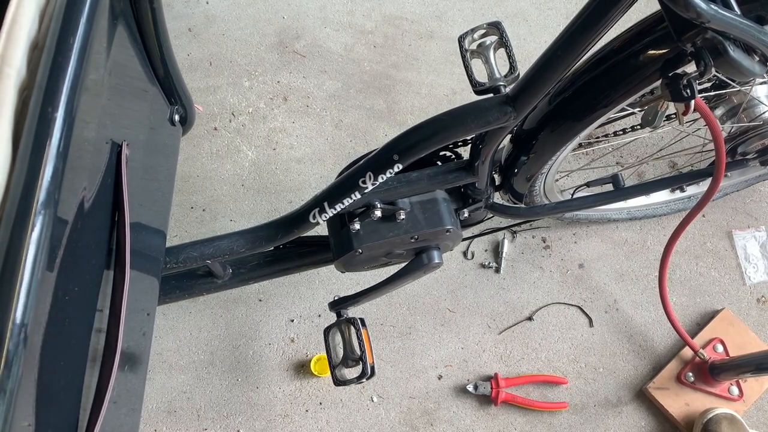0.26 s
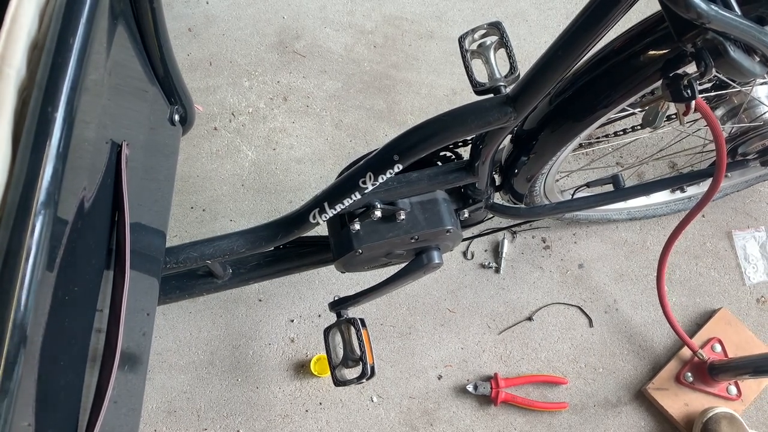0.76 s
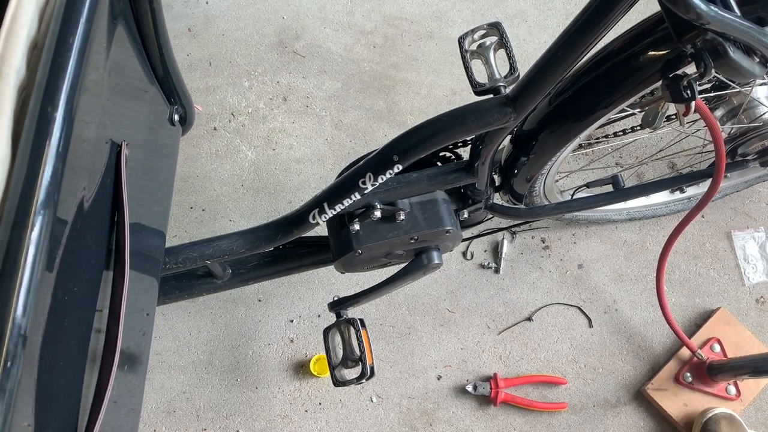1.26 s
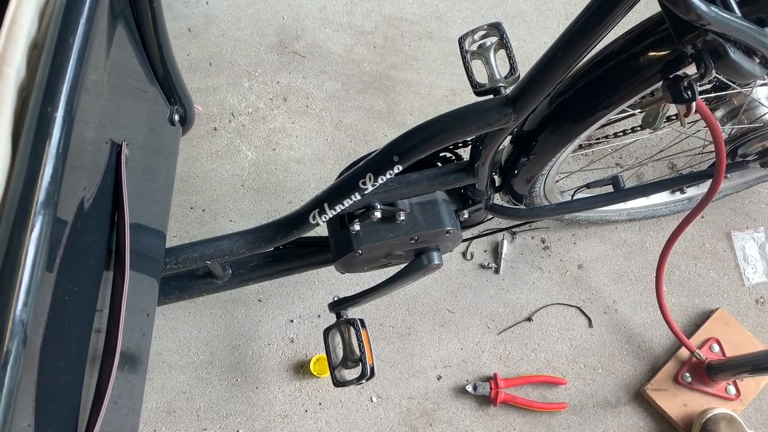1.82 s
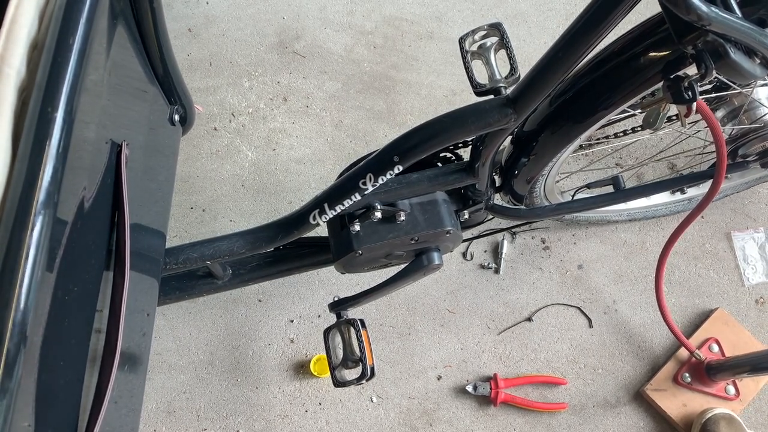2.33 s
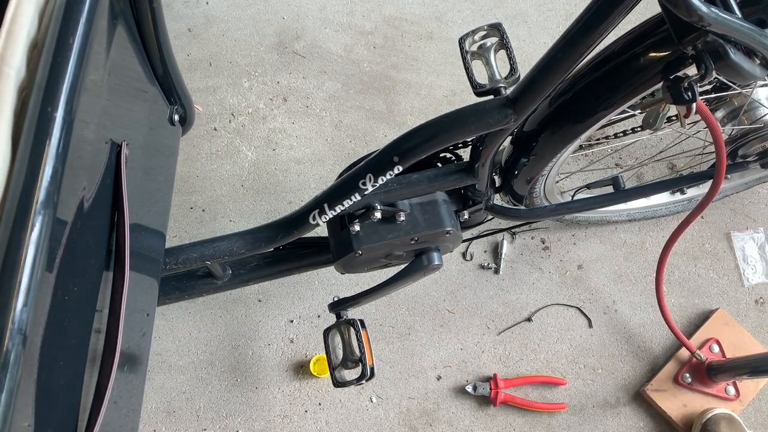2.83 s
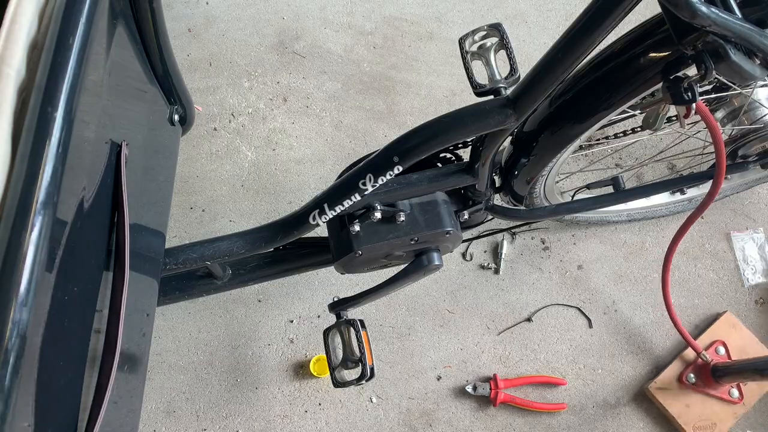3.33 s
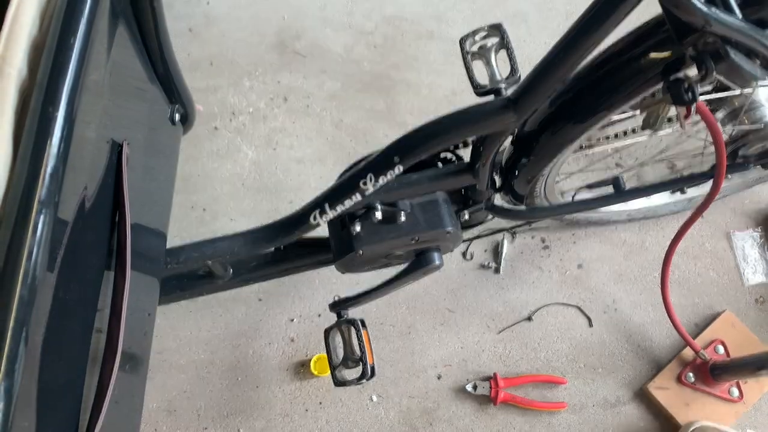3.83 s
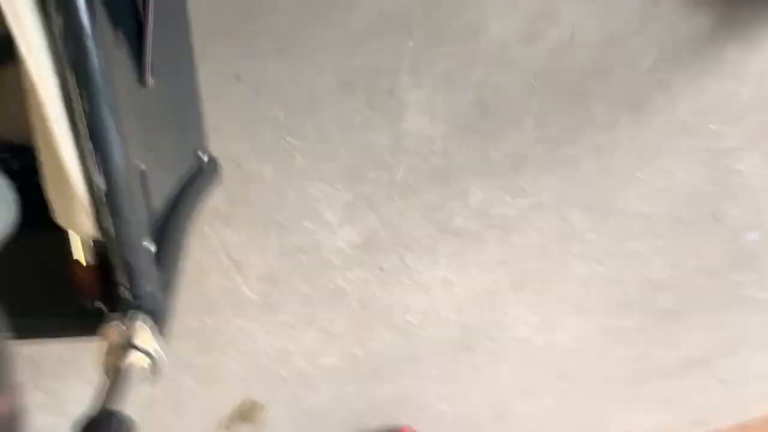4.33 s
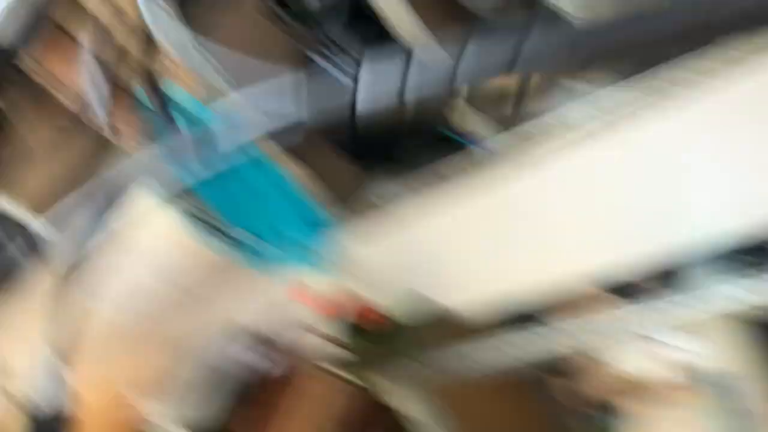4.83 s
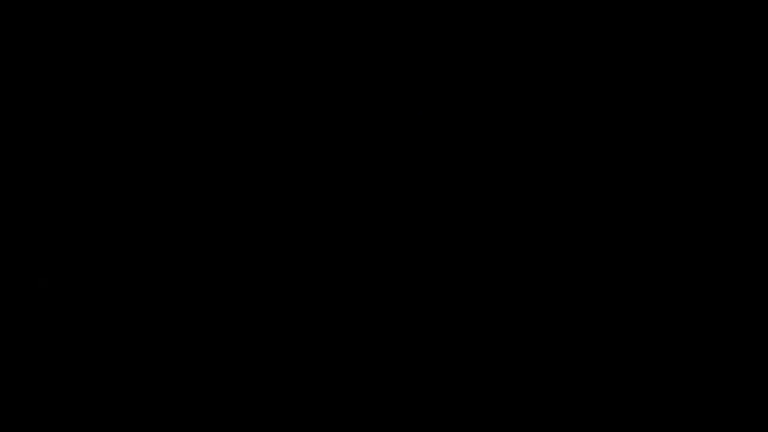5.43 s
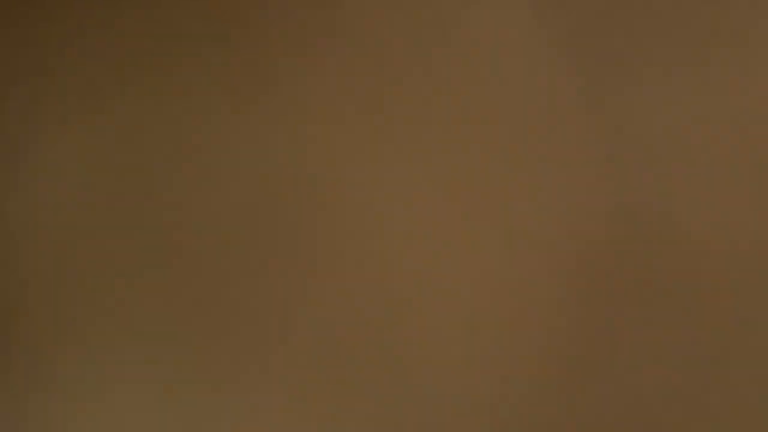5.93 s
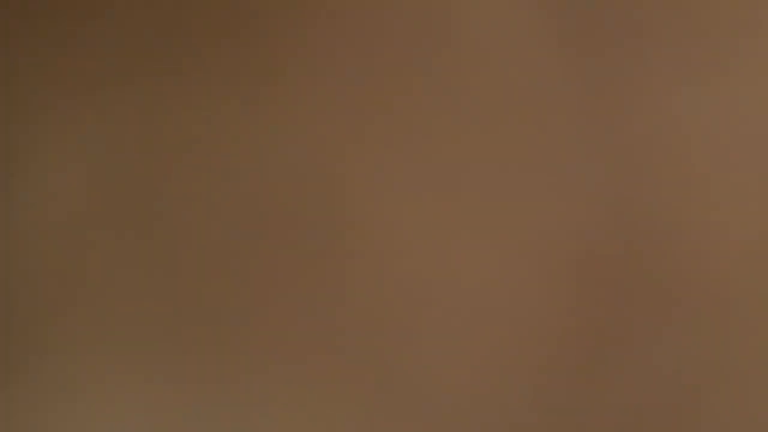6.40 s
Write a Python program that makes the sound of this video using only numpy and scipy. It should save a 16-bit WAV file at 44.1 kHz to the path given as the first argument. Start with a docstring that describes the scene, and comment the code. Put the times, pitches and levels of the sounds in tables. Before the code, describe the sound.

A floor pump hisses and knocks in steady strokes in a garage, then stops, and fingers bump and rub loudly on the microphone's case.

```python
"""Floor pump in a garage, then a handled phone

A floor pump on a wooden board inflates a bicycle tyre: coloured, fluttering noise hisses and sprays, a sinking
tone whistles, and decaying modes with noise bursts make the knocks at the bottom, the clicks at the top and
the clacks of the board on the concrete. Pumping stops; fingers bump, rub and squeak on the phone as it is swung
round and put down (swelling notes, soft thumps, stick-slip noise). A few light ticks of noise come late.
"""
import sys
import numpy as np
from scipy import signal
from scipy.fft import rfft, irfft
from scipy.io import wavfile
from scipy.ndimage import uniform_filter1d

SR = 44100
rng = np.random.default_rng(int(sys.argv[2]) if len(sys.argv) > 2 else 0)


def to_wav(sig):
    """Store sig (one row per channel, or 1-D mono) as 16-bit WAV at the path in sys.argv[1].

    Samples outside -1..1 are clipped; the rate is SR.
    """
    pcm = np.clip(np.atleast_2d(sig), -1, 1) * 32767
    pcm = np.round(pcm).astype(np.int16)
    wavfile.write(sys.argv[1], SR, pcm.T)  # frames by channels


N = 293706
TIME = np.arange(N) / SR

# All levels here are relative: functions add offsets, flutter and panning. Knocks: down strokes ending as the
# piston hits the bottom, the last two as the pump is handled. Each row: time of knock in seconds, ring, crack,
# air and whistle levels in dB, whistle sag in Hz per second.
KNOCKS = [(0.067, -18.5, -16.5, -50, -44, 6000), (0.7653, -15.5, -15, -44.5, -47.5, 9000),
          (1.5232, -17.5, -18, -44.5, -48, 3800), (2.2466, -16, -13, -48, -47, 7700),
          (2.74, -32, -32, -70, -82, 5000), (3.176, -27.5, -32, -88, -87, 5000),
          (3.489, -48, -28, -68, -88, 5000)]
# Pump body modes. Each row: nominal frequency in Hz, level in dB, t60 in seconds.
PUMP_MODES = [(590, -18, .03), (870, -14, .045), (1005, -17, .12), (1030, 0, .02), (1075, -16, .11),
              (1400, -15, .035), (1790, -18, .1), (1900, -9, .027), (1925, -17.5, .09), (2010, -20, .06),
              (2980, -19, .07)]
# Steel barrel modes. Each row: nominal frequency in Hz, level in dB, t60 in seconds.
BARREL_MODES = [(1750, -1.5, .1), (3100, -6, .09), (3960, 2, .16), (7580, 6, .055), (8110, 6.5, .06),
                (9950, 2.5, .06), (13380, 5, .045)]
# Wooden board modes. Each row: nominal frequency in Hz, level in dB, t60 in seconds.
BOARD_MODES = [(980, -3, 0.044), (1340, 0, .055), (1500, -4, 0.07), (2150, -7.5, 0.037)]
# Steel rod and handle modes. Each row: nominal frequency in Hz, level in dB, t60 in seconds.
HANDLE_MODES = [(2190, 5, .07), (2866, -2.5, .25), (3671, -1.5, .18), (5340, -4, 0.23)]
# Up strokes. Each row: time of top in seconds, click, air and inlet puff levels in dB.
UP_STROKES = [(0.372, -18, -39.5, -39), (1.0919, -18, -40, -40), (1.8408, -23.5, -43, -41.5),
              (2.653, -42, -48.5, -50), (3.1725, -36, -57.5, -64)]
# Board and pump clack on the floor. Each row: time in seconds, clack and thud levels in dB.
CLACKS = [(0.4602, -15, -42.5), (0.486, -27, -45), (1.1845, -14, -57), (1.206, -23, -47), (1.927, -23, -48),
          (2.802, -30, -71), (2.983, -34.5, -72), (3.895, -29, -52), (3.9829, -23.5, -38)]
# Handle clinks on the rod. Each row: time in seconds, level in dB.
CLINKS = [(0.849, -34.5), (1.205, -28.5), (2.3351, -24.5)]
# Seal, shoes and board rub. Each row: start in seconds, length in seconds, centre in Hz,
# approximate width in Hz, level in dB.
SCUFFS = [(0.308, 0.032, 987, 69.3, -44), (1.025, 0.041, 974, 71, -45), (1.75, 0.047, 1000, 90, -44),
          (1.848, 0.053, 200, 95, -36), (1.913, 0.11, 180, 120, -31.5), (1.918, 0.091, 425, 397, -43.5),
          (2.549, 0.13, 2800, 1400, -47), (2.938, 0.083, 460, 630, -40), (3.96, 0.091, 403, 479, -37),
          (4.157, 0.078, 297, 168.4, -36.5), (4.097, 0.04, 420, 450, -40), (4.652, 0.22, 257, 71.4, -50.5)]
# Rustles as the pump is let go and the phone swung round. Each row: start in seconds, length in seconds,
# hiss and fine spray levels in dB.
RUSTLES = [(2.942, 0.062, -45, -51), (3.33, 0.2, -55, -68), (3.512, .17, -53, -58.5),
           (3.864, 0.24, -49.5, -51.5), (3.967, 0.038, -40, -40), (4.102, 0.051, -48.5, -47.5),
           (4.126, 0.29, -48.5, -57), (3.002, 2.38, -63.5, -70)]
# Fingers bump the phone case. Each row: time in seconds, note level in dB, pitch at full swell in Hz,
# tick level in dB, swell in seconds, shove level in dB.
BUMPS = [(3.441, -45, 345, -56, .005, -54), (4.2467, -7.5, 844, -35.5, .004, -20.5),
         (4.251, -10.5, 450, -25.5, .0045, -19.5), (4.271, -11, 760, -9.5, .005, -22.5),
         (4.281, -10.5, 583, -20, .0045, -16), (4.4073, -9, 620, -23, .0042, -19),
         (4.427, -37, 584.5, -22, 0.0034, -46), (4.49, -16.5, 620, -30.5, 0.0049, -21.5),
         (4.529, -26, 520, -50, .007, -45), (4.542, -7.5, 450, -11, 0.0037, -10),
         (4.585, -18.5, 575, -39, .0045, -32.5), (4.602, -14.5, 640, -28.5, 0.0023, -15.5),
         (4.648, -30.5, 560, -40, .007, -27), (5.097, -15, 500, -13, .0055, -16),
         (5.2474, -8.5, 516, -13, 0.0045, -22), (5.2566, -16, 560, -22.5, .004, -19),
         (5.268, -19.5, 540, -36.5, .004, -22), (5.313, -29, 620, -50, .0035, -28),
         (5.358, -32.5, 580, -52.5, 0.0043, -30.5), (5.408, -17, 540, -30.5, 0.0046, -19),
         (5.4469, -9, 580, -13, .004, -24), (5.4552, -10.5, 610, -12, .0033, -15),
         (5.466, -19, 486, -27.5, .004, -22.5), (5.526, -23, 500, -29.5, .003, -19),
         (5.6, -36.5, 480, -37.5, .004, -31)]
# The plastic case creaks in single snaps. Each row: time in seconds, level in dB, nominal pitch in Hz.
CREAKS = [(4.2762, -17, 1390), (4.542, -13.5, 1187), (5.098, -14, 1100), (5.2477, -12, 1676),
          (5.4485, -13, 1580), (5.4558, -7.5, 1950)]
# Skin rubs over the case. Each row: start in seconds, length in seconds, mean slip rate in Hz,
# tone and rasp levels in dB, rasp top in Hz, left minus right in dB.
RUBS = [(4.203, 0.1, 590, -39, -25.5, 13000, 5), (4.264, 0.026, 694, -25.5, -12.5, 16000, 7),
        (5.423, 0.062, 563, -45, -32, 6000, 11.5), (5.425, 0.22, 528, -61.5, -48.5, 10200, 3)]
# The hand presses and buffets the case. Each row: start in seconds, length in seconds, top in Hz, level in dB.
PUSHES = [(4.234, 0.081, 700, -29), (4.512, 0.056, 644, -29.5), (4.874, 0.058, 450, -23.5),
          (4.942, 0.065, 260, -32.5), (5.076, 0.04, 330, -24.5), (5.234, 0.062, 693, -26.5),
          (5.427, 0.062, 647, -24), (5.552, 0.035, 450, -35), (5.588, 0.1, 108, -34.5)]
# Something is handled further off. Each row: time in seconds, level in dB.
TICKS = [(4.769, -41), (5.835, -46), (6.002, -40), (6.087, -41), (6.13, -49.5), (6.189, -42.5),
         (6.239, -41.5), (6.441, -57.5), (6.628, -44.5)]
# Rumble of the moving phone, interpolated. Each row: time in seconds, level in dB.
RUMBLE = [(0.0, -60), (3.5, -58), (4.01, -49), (4.15, -38), (4.38, -46.5), (4.92, -41.5), (5.29, -63),
          (5.47, -33.5), (5.53, -41), (5.67, -65), (6.03, -79), (6.66, -81.5)]
# Resonances of the left microphone port. Each row: mean frequency in Hz, level in dB.
PORT_MODES = [(1790, 1), (2480, -3), (2920, 1), (3150, 1), (3350, -0.5), (4060, -1.5), (4680, -4.5),
              (4860, -1.5), (7980, -5.5)]
# Spectrum of the piston crack. Each row: frequency in Hz, level in dB.
CRACK_COLOUR = [(60, -22.5), (130, -2.5), (270, -38), (550, -8.5), (720, -12.5), (1080, 3.5), (1400, 4.5),
                (1900, 5.5), (2500, -3), (3100, -4.5), (4500, -7), (7000, -16), (12500, -11),
                (16000, -26.5)]
# Spectrum of the rod click. Each row: frequency in Hz, level in dB.
CLICK_COLOUR = [(230, -25), (500, -9), (1650, 3), (2050, -8), (2700, 7.5), (3800, 5.5), (5500, -1.5),
                (8000, 0.5), (13000, 7.5), (16000, -6.5)]
# Spectrum of the board clack. Each row: frequency in Hz, level in dB.
CLACK_COLOUR = [(450, -18), (750, -15.5), (1000, -0.5), (1400, 0), (2200, -6), (3500, -11.5), (7000, -20),
                (13000, -21), (16000, -34.5)]
# Spectrum of ticks and piston scrape. Each row: frequency in Hz, level in dB.
TICK_COLOUR = [(200, -23.5), (900, -6), (1250, 3), (1560, 9), (2000, 4.5), (2700, -1), (4000, -4.5),
               (7000, -11), (16000, -33)]
# Spectrum of ticks and grit on the phone case. Each row: frequency in Hz, level in dB.
CASE_COLOUR = [(300, 9.5), (1100, 7.5), (1800, 11.5), (2300, -2.5), (3100, -12), (4800, 1), (6500, -10.5),
               (8000, -0.5), (11000, -8), (13500, -1), (16000, -17)]
# Spectrum of air in the barrel and of handle contact. Each row: frequency in Hz, level in dB.
HISS_COLOUR = [(400, -7.5), (780, -7.5), (1000, 2.5), (1220, -2.5), (1600, 6), (2150, -3.5), (2400, 0.5),
               (3500, -5), (6000, -7), (8300, -6.5), (10300, -9.5), (11500, -18.5), (16000, -32)]
# Spectrum of the air spray. Each row: frequency in Hz, level in dB.
SPRAY_COLOUR = [(6000, -51), (10500, -4), (13900, 4), (15000, -10), (15600, -6.5), (16000, -20.5)]
# Spectrum of the rumble. Each row: frequency in Hz, level in dB.
RUMBLE_COLOUR = [(20, -22.5), (50, 2.5), (75, 4.5), (105, -1), (190, -8.5), (270, -9.5), (400, -19),
                 (1500, -41), (8000, -70.5)]
# Spectrum of the still garage. Each row: frequency in Hz, level in dB.
QUIET_COLOUR = [(30, -3.5), (120, -1), (400, -16.5), (1600, -12), (2500, -11), (7000, -19.5), (14000, -28)]
# Garage decay. Each row: frequency in Hz, t60 in seconds.
GARAGE_T60 = [(100, 0.31), (1000, 0.19), (3000, 0.27), (8000, 0.3), (15000, 0.13)]

# An up stroke gathers speed until the stop; the inlet puffs as it begins.
LIFT_S, LIFT_STOP_S, LIFT_SPRAY_DB = 0.17, 0.12, -4.5
PUFF_LEAD_S, PUFF_S = 0.19, 0.077
# A down stroke swells and is braked by the pressure; the valve sings towards its end.
PUSH_S, PUSH_SPRAY_DB = 0.2, -2.5
WHISTLE_S, WHISTLE_END_HZ = 0.15, 7430
# Air leaks steadily, then dies away.
LEAK_DB, LEAK_SPRAY_DB, LEAK_END_S, LEAK_FALL_DB_PER_S = -45.5, -51, 2.584, 64
# Dry grit under the seal.
GRIT_PER_S, GRIT_DB, GRIT_SPREAD_DB = 150, -9, 6
# Faint metallic ring during the swing.
RING_S, RING_ATTACK_S, RING_HOLD_S, RING_RELEASE_S = 4.22, 0.17, 0.42, 0.31
RING_HZ, RING_DB = 1460, -57.5
# Loose parts bounce ever more weakly after a blow.
BOUNCE_GAP_S, BOUNCE_DB, BOUNCE_FALL_DB = 0.012, -11.5, -2.5
# Skin drags on the case around every touch; level relative to the note.
DRAG_S, DRAG_LEAD_S, DRAG_DB, DRAG_LOW_HZ, DRAG_HIGH_HZ = 0.03, 0.0092, -19, 253, 760
BUMP_SAG_PER_S = 28  # exponential fall of pitch
PALM_S, PALM_DB, PALM_HZ = 4.898, -11, 140.6
CREAK_T60_S, CREAK_OVERTONE_RATIO, CREAK_OVERTONE_DB = 0.014, 1.5, -9.5
TICK_T60_S = 0.039
# A fingertip squeaks across the left microphone port.
SQUEAK_S, SQUEAK_LENGTH_S, SQUEAK_HZ, SQUEAK_DB, SQUEAK_RASP_DB = 5.069, 0.026, 436.5, -7.5, -9
TOP_HZ = 16200


def undb(db):
    """Amplitude gain from dB."""
    return 10 ** (np.asarray(db) / 20)


def on_log_axis(points, hz):
    """Interpolate (Hz, value) points over log frequency."""
    f, value = np.transpose(points)
    return np.interp(np.log(np.maximum(hz, 1)), np.log(f), value)


def unit(x):
    """Scale to rms 1."""
    return x / np.sqrt(np.mean(x ** 2))


def peak_at(x, db, size=176):
    """Scale so that the loudest 4 ms have this rms level."""
    loudest_power = uniform_filter1d(x ** 2, size).max()
    return x * undb(db) / np.sqrt(loudest_power)


def colour(x, points, size=2048):
    """Minimum-phase filter with the given spectrum."""
    log_gain = on_log_axis(points, np.fft.rfftfreq(size, 1 / SR)) * np.log(10) / 20
    cepstrum = irfft(log_gain)
    # Folding the cepstrum makes the filter causal.
    cepstrum[1:size // 2] *= 2
    cepstrum[size // 2 + 1:] = 0
    response = irfft(np.exp(rfft(cepstrum)))
    return signal.fftconvolve(x, response)[:len(x)]


def filt(x, hz, kind, order=2):
    """Butterworth filter."""
    sos = signal.butter(order, np.minimum(hz, SR / 2 - 1000), kind, fs=SR, output="sos")
    return signal.sosfilt(sos, x)


def fade(t60_s, size=8192):
    """Exponential decay, cut off after size samples."""
    return 1000 ** (-TIME[:size] / t60_s)


def arch(length_s):
    """Half-sine swell and fall."""
    return np.sin(np.linspace(0, np.pi, int(length_s * SR)))


def swell(start_s, length_s):
    """Full-length gain that rises and falls once."""
    return np.sin(np.pi * np.clip((TIME - start_s) / length_s, 0, 1))


def flutter(rate_hz, depth_db):
    """Gain that wanders between random steps."""
    steps = rng.standard_normal(1024)
    return undb(depth_db * np.interp(TIME * rate_hz, np.arange(len(steps)), steps))


def mottle(x, depth_db, size=1024):
    """Turbulence: narrow bands swell and sink on their own for a few tens of milliseconds."""
    bands = signal.stft(x, nperseg=size)[2]
    walk = rng.standard_normal(bands.shape[-2:])
    walk = uniform_filter1d(walk, size=6, axis=0)
    walk = uniform_filter1d(walk, size=4, axis=1)
    mottled = signal.istft(bands * undb(depth_db * unit(walk)), nperseg=size)[1]
    return unit(mottled[..., :N])


def burst(points, t60_s, attack_s=.0001, ragged_db=0):
    """Decaying coloured contact noise, broken into uneven grains of 64 samples."""
    envelope = fade(t60_s)
    size = len(envelope)
    envelope = envelope * np.minimum(TIME[:size] / attack_s, 1)
    grains = np.repeat(rng.standard_normal(size), 64)[:size]
    return colour(envelope * undb(ragged_db * grains) * rng.standard_normal(size), points)


def struck(modes, detune=0.0055):
    """Decaying modes set off together, their pitch a little different at every blow."""
    out = 0
    for hz, db, t60_s in modes:
        envelope = fade(t60_s)
        pitch_hz = hz * (1 + detune * rng.standard_normal())
        out = out + undb(db) * envelope * np.sin(2 * np.pi * pitch_hz * TIME[:len(envelope)])
    return out


def thump(hz, width=.35, body_db=-9, soft=1.3, cycles=1.5, size=8192):
    """A soft blow rings a damped shell and shoves it bodily; low notes lag by a few of their own cycles."""
    f = np.fft.rfftfreq(size, 1 / SR) + 1
    shell = 1 / (1 + 1j * (f / hz - hz / f) / width)
    body = undb(body_db) / (1 + (50 / f) ** 4) / (1 + (f / hz) ** 4)
    contact = 1 / np.sqrt(1 + (f / (soft * hz)) ** 14)
    lag = np.exp(-2j * np.pi * cycles * np.log(f))
    return irfft((shell + 1j * body) * contact * lag) * np.linspace(1, 0, size) ** 2


def bounces(points, t60_s, count=4):
    """Uneven, weakening after-hits that follow a blow of level 0 dB."""
    out = np.zeros(SR)
    for k, (early, size) in enumerate(rng.random((count, 2))):
        db = BOUNCE_DB + BOUNCE_FALL_DB * (k + 2 * size - 1)
        add(out, BOUNCE_GAP_S * (k + 1 - early / 2), peak_at(burst(points, t60_s), db))
    return out


def ports(x, lag_ms, pan_db, twist_rad=0):
    """Two microphones: positive lag reaches the right first, positive pan favours the left, twist parts phases."""
    f = np.fft.rfftfreq(len(x), 1 / SR)
    turn = np.exp(1j * (np.pi * f * lag_ms / 1000 + twist_rad / 2))
    left = irfft(rfft(x) / turn, len(x)) * undb(pan_db / 2)
    right = irfft(rfft(x) * turn, len(x)) / undb(pan_db / 2)
    return np.array([left, right])


def diffuse(size, apart_hz=550):
    """Noise from all sides: alike on both microphones in the bass, unrelated in the treble."""
    mid, side = rng.standard_normal((2, size))
    side = filt(side, apart_hz, "high", order=1)
    return np.array([mid + side, mid - side]) / np.sqrt(2)


def add(track, s, x):
    """Mix a sound in at time s."""
    start = int(s * SR)
    x, start = x[..., max(-start, 0):], max(start, 0)
    track[..., start:start + x.shape[-1]] += x[..., :N - start]


def background(quiet_db=-77):
    """Low noise rumbles on the moving phone, a fluttering sine rings faintly, soft noise is the still garage."""
    rumble = unit(np.array([colour(c, RUMBLE_COLOUR) for c in diffuse(N, apart_hz=221)]))
    rumble = rumble * undb(np.interp(TIME, *np.transpose(RUMBLE)))
    corners_s = np.cumsum([RING_S, RING_ATTACK_S, RING_HOLD_S, RING_RELEASE_S])
    envelope = np.interp(TIME, corners_s, [0, 1, 1, 0]) ** 2
    ring = np.sqrt(2) * envelope * np.sin(2 * np.pi * RING_HZ * TIME) * flutter(45, depth_db=2.5)
    quiet = unit(np.array([colour(c, QUIET_COLOUR) for c in diffuse(N)]))
    return rumble + undb(RING_DB) * ring + undb(quiet_db) * quiet


def airflow():
    """Gains of hiss and spray: leak, strokes, inlet puffs and rustles add in power."""
    leak = undb(-LEAK_FALL_DB_PER_S * np.maximum(TIME - LEAK_END_S, 0))
    parts = [(leak, LEAK_DB, LEAK_SPRAY_DB)]
    for top_s, _, db, puff_db in UP_STROKES:
        speed = np.interp(TIME, [top_s - LIFT_S, top_s, top_s + LIFT_STOP_S], [0, 1, 0])
        parts.append((np.sqrt(speed), db, db + LIFT_SPRAY_DB))
        parts.append((swell(top_s - PUFF_LEAD_S, PUFF_S), -np.inf, puff_db))  # spray only
    for knock_s, _, _, db, *_ in KNOCKS:
        parts.append((swell(knock_s - PUSH_S, PUSH_S), db, db + PUSH_SPRAY_DB))
    for s, length_s, db, fine_db in RUSTLES:
        parts.append((swell(s, length_s), db, fine_db))
    hiss_power = sum((shape * undb(db)) ** 2 for shape, db, _ in parts)
    spray_power = sum((shape * undb(db)) ** 2 for shape, _, db in parts)
    return np.sqrt(hiss_power), np.sqrt(spray_power)


def grit():
    """Sparse tiny clicks of very uneven size."""
    happens = rng.random(N) < GRIT_PER_S / SR
    size = np.minimum(rng.exponential(size=N), 4)
    return unit(happens * undb(GRIT_SPREAD_DB * size))


def air(hiss_db=-1, direct_db=-2):
    """Turbulent air and grit ring the barrel, air sprays past the seal; low and high parts flutter separately."""
    hiss_gain, spray_gain = airflow()
    direct = undb(direct_db) * rng.standard_normal(N) + undb(GRIT_DB) * grit()
    flow = diffuse(N) + ports(direct, lag_ms=.27, pan_db=-2)
    hiss = mottle(np.array([colour(c, HISS_COLOUR) for c in flow]), depth_db=2.5)
    low = filt(hiss, 2000, "low", order=1)
    hiss = low * flutter(35, depth_db=2.1) + (hiss - low) * flutter(70, depth_db=2)
    spray = mottle(colour(rng.standard_normal(N), SPRAY_COLOUR), depth_db=2)
    spray = spray * flutter(55, depth_db=1.4)
    return undb(hiss_db) * hiss_gain * hiss + spray_gain * spray


def valve(waver_hz=150, wander_hz=70):
    """An airy, wavering whistle that sinks as the stroke slows."""
    out = np.zeros(N)
    envelope = np.sqrt(np.abs(arch(WHISTLE_S)))
    t = TIME[:len(envelope)]
    for knock_s, _, _, _, db, sag_hz_per_s in KNOCKS:
        wander = np.interp(t, np.linspace(0, WHISTLE_S, 6), rng.standard_normal(6))
        pitch_hz = WHISTLE_END_HZ + sag_hz_per_s * (WHISTLE_S - t) + wander_hz * wander
        tone = np.sqrt(2) * np.sin(2 * np.pi * np.cumsum(pitch_hz) / SR)
        waver = unit(filt(rng.standard_normal(SR), waver_hz, "low"))[:len(envelope)]
        add(out, knock_s - WHISTLE_S, undb(db) * envelope * waver * tone)
    return out


def piston(ring_db=2.0, crack_db=-1.0, seat_s=0.0023, crack_t60_s=0.044, bounce_db=-0.5,
           scrape_s=.011, scrape_db=-23):
    """The piston scrapes into its seat, touches with a crack, rings the pump body and shakes its loose parts;
    the last knocks come as the pump is handled."""
    out = np.zeros(N)
    for s, db, bright_db, *_ in KNOCKS:
        ring = struck(PUMP_MODES, detune=.011)
        seating = np.minimum(TIME[:len(ring)] / seat_s, 1)
        scrape = burst(TICK_COLOUR, t60_s=.08, attack_s=scrape_s)
        crack = burst(CRACK_COLOUR, crack_t60_s, ragged_db=2.5) * seating
        add(out, s - scrape_s, peak_at(scrape, bright_db + scrape_db))
        add(out, s, peak_at(ring * seating, db + ring_db))
        add(out, s - .001, peak_at(crack, bright_db + crack_db))
        add(out, s, undb(db + bounce_db) * bounces(CRACK_COLOUR, t60_s=.018))
    return out


def scuffs():
    """Band noise in short arches: the seal squeaks on the upstroke, shoes and board judder on the floor."""
    out = np.zeros(N)
    for s, length_s, hz, width_hz, db in SCUFFS:
        envelope = arch(length_s)
        spread = 1 + width_hz / hz / 2
        judder = filt(rng.standard_normal(SR), [hz / spread, hz * spread], "band")[-len(envelope):]
        add(out, s, undb(db) * envelope * unit(judder))
    return out * flutter(70, depth_db=3)


def rod(click_db=-4, second_s=0.0039, second_db=-1, ring_db=-6, slide_s=0.0052, slide_db=-9, ragged_db=3):
    """The rod slides into the barrel cap, meets it in a bright, gritty double click and leaves the tube ringing."""
    out = np.zeros(N)
    for s, db, _, _ in UP_STROKES:
        slide = burst(CLICK_COLOUR, t60_s=0.05, attack_s=.003, ragged_db=ragged_db)
        first = burst(CLICK_COLOUR, t60_s=0.058, attack_s=0.00095, ragged_db=ragged_db)
        second = burst(CLICK_COLOUR, t60_s=0.052, ragged_db=ragged_db)
        add(out, s - slide_s, peak_at(slide, db + slide_db))
        add(out, s, peak_at(first, db + click_db))
        add(out, s + second_s, peak_at(second, db + second_db))
        add(out, s + second_s, peak_at(struck(BARREL_MODES, detune=.002), db + ring_db))
    return out


def board(clack_db=-3, ring_db=-5, thud_db=4, thud_hz=100, bounce_db=-3):
    """The board drops on the concrete with a hard clack, a woody ring and a low thud, then clatters."""
    out = np.zeros(N)
    thud = thump(thud_hz, width=0.78, body_db=-21.0, soft=1.6, cycles=1.4)
    for s, db, low_db in CLACKS:
        clack = burst(CLACK_COLOUR, t60_s=0.028, attack_s=0.0009, ragged_db=3.5)
        add(out, s, peak_at(clack, db + clack_db))
        add(out, s, peak_at(struck(BOARD_MODES, detune=0.023), db + ring_db))
        add(out, s, undb(db + bounce_db) * bounces(CLACK_COLOUR, t60_s=0.019))
        add(out, s, peak_at(thud, low_db + thud_db))
    return out


def handle(ring_db=-7):
    """A grazing touch sets the handle and rod ringing."""
    out = np.zeros(N)
    for s, db in CLINKS:
        graze = burst(HISS_COLOUR, t60_s=.055, attack_s=0.0036, ragged_db=3.0)
        add(out, s, peak_at(graze, db))
        add(out, s + .002, peak_at(struck(HANDLE_MODES, detune=.002), db + ring_db))
    return out


def drags():
    """A brief ragged judder of skin around each touch."""
    out, envelope = np.zeros((2, N)), arch(DRAG_S) ** 2
    for s, db, *_ in BUMPS:
        noise = diffuse(size=8192, apart_hz=400)
        judder = filt(noise, [DRAG_LOW_HZ, DRAG_HIGH_HZ], "band", order=3)[:, -len(envelope):]
        add(out, s - DRAG_LEAD_S, undb(db + DRAG_DB) * envelope * unit(judder))
    return out


def ring_note(hz, swell_s, size=8192):
    """A hollow note that swells, dies and sinks in pitch as the fingertip settles."""
    t = TIME[:size]
    pitch_hz = hz * np.exp(BUMP_SAG_PER_S * (swell_s - t))
    envelope = (t / swell_s * np.exp(-t / swell_s)) ** 3
    return envelope * np.sin(2 * np.pi * (np.cumsum(pitch_hz) / SR + rng.random()))


def bumps(tick_db=1, shove_hz=370):
    """Soft fingertips swell a note in the case, tick on it and shove it; creaks snap; the palm lands once."""
    thumps, taps = np.zeros((2, N))
    shove = thump(shove_hz, width=1.5, body_db=-3.5, soft=2.06, cycles=1.35)
    for s, db, hz, bright_db, swell_s, shove_db in BUMPS:
        add(thumps, s, peak_at(ring_note(hz, swell_s), db))
        add(thumps, s, peak_at(shove, shove_db))
        tick = burst(CASE_COLOUR, t60_s=0.011, attack_s=0.0018)
        add(taps, s, peak_at(tick, bright_db + tick_db))
    for s, db, hz in CREAKS:
        overtone = (hz * CREAK_OVERTONE_RATIO, CREAK_OVERTONE_DB, CREAK_T60_S)
        add(taps, s, peak_at(struck([(hz, 0, CREAK_T60_S), overtone]), db))
    palm = thump(PALM_HZ, width=.9, body_db=-3, soft=3.2, cycles=1.2)
    add(thumps, PALM_S, peak_at(palm, PALM_DB))
    return ports(thumps, lag_ms=-.13, pan_db=-.5, twist_rad=-.7) + ports(taps, lag_ms=-.3, pan_db=.5)


def grip(slip_jitter=0.084):
    """The hand shifts its grip: ragged low pushes and stick-slip rubs."""
    out = np.zeros((2, N))
    for s, length_s, top_hz, db in PUSHES:
        envelope = arch(length_s)
        buffet = filt(diffuse(SR, apart_hz=120.5), top_hz, "low", order=5)
        buffet = filt(buffet, 46, "high")[:, -len(envelope):]
        add(out, s, undb(db) * envelope * unit(buffet))
    for s, length_s, slip_hz, tone_db, rasp_db, top_hz, pan_db in RUBS:
        envelope = arch(length_s)
        wander, noise = rng.standard_normal((2, SR))[:, :len(envelope)]
        rate_hz = slip_hz * (1 + slip_jitter * unit(filt(wander, 160, "low")))
        slip = np.sin(2 * np.pi * np.cumsum(rate_hz) / SR)
        puffs = noise * undb(4.4 * slip)  # each slip lets go a puff of grit that rings the case
        rasp = unit(filt(colour(puffs, CASE_COLOUR), top_hz, "low", order=4))
        rub = undb(tone_db) * unit(slip) + undb(rasp_db) * rasp
        add(out, s, ports(envelope * rub, lag_ms=-0.29, pan_db=pan_db))
    return out


def ticks(scrape_s=0.0059):
    """Small dry ticks, each with a short scraping onset."""
    out = np.zeros(N)
    for s, db in TICKS:
        tick = burst(TICK_COLOUR, TICK_T60_S, scrape_s, ragged_db=5.0)
        add(out, s - scrape_s / 2, peak_at(tick, db))
    return out


def wavering(hz, spread_hz, size):
    """A sine whose pitch wanders slowly at random."""
    wander = unit(filt(rng.standard_normal(SR), 160, "low"))[:size]
    return np.sin(2 * np.pi * np.cumsum(hz + spread_hz * wander) / SR)


def squeak(slip_jitter=0.048, gate_db=2.0, tone_pan_db=6, wander_hz=40, hiss_db=-7):
    """Stick and slip grow until the finger lets go: a low tone on both sides, puffs ring the left port alone."""
    out, envelope = np.zeros((2, N)), arch(SQUEAK_LENGTH_S)
    size = len(envelope)
    envelope = np.sqrt(np.abs(envelope)) * np.linspace(0, 1, size)
    slip = unit(wavering(SQUEAK_HZ, SQUEAK_HZ * slip_jitter, size))
    ring = unit(sum(undb(db) * wavering(hz, wander_hz, size) for hz, db in PORT_MODES))
    hiss = unit(filt(rng.standard_normal(size), [2200, 7500], "band"))
    rasp = unit((ring + undb(hiss_db) * hiss) * undb(gate_db * slip))
    tone = undb(SQUEAK_DB) * envelope * slip
    add(out, SQUEAK_S, ports(tone, lag_ms=-0.43, pan_db=tone_pan_db))
    add(out[0], SQUEAK_S, undb(SQUEAK_RASP_DB) * envelope * rasp)
    return out


def fingers():
    """Everything the hand does to the phone, carried straight through the case."""
    return bumps() + drags() + grip() + squeak()


def garage(x, first_s=0.0051, build_s=0.0018, patchy_db=2, size=22050):
    """Dense reflections from near walls: a noise tail dying away band by band."""
    f, t, bands = signal.stft(diffuse(size), SR)
    decay = undb(-60 * t / on_log_axis(GARAGE_T60, f)[:, None])
    tail = signal.istft(bands * decay, SR)[1][:, :size]
    tail *= np.clip((TIME[:size] - first_s) / build_s, 0, 1)
    tail *= flutter(180, depth_db=patchy_db)[:size]
    tail /= np.sqrt(np.sum(tail ** 2) / 2)
    return signal.fftconvolve(x[None], tail, axes=1)[:, :N]


def scene():
    """Pump to the right, its top clicks to the left; the garage answers all but air and background."""
    knock, click, clack, tick = piston(), rod(), board() + handle(), ticks()
    whistle, scuff, hand = valve(), scuffs(), fingers()
    pump = ports(clack + whistle, lag_ms=.265, pan_db=-2.8)
    pump += ports(click, lag_ms=-.16, pan_db=.3)
    pump += ports(knock, lag_ms=0.27, pan_db=-6.0)
    around = ports(tick, lag_ms=-.4, pan_db=1.5) + ports(scuff, lag_ms=.15, pan_db=-1)
    sent = undb(-6) * knock + undb(-6) * click + undb(-2.5) * clack + undb(-5.0) * tick
    sent += undb(-1.0) * (whistle + scuff) + undb(-42.0) * hand[0]
    return pump + around + hand + garage(sent) + air() + background()


def record(dry, stereo_hz=8400, shared_hz=11000, opposed_db=-2):
    """Stereo up to the treble, out of phase in a narrow band there, nearly mono above; clipped, then low-passed."""
    opposed = undb(opposed_db) * filt(dry[0], [stereo_hz, shared_hz], "band", order=6)
    shared = ports(filt(dry[0], shared_hz, "high", order=11), lag_ms=.0065, pan_db=0)
    wet = filt(dry, stereo_hz, "low", order=12) + np.array([opposed, -opposed]) + shared
    low_pass = signal.ellip(8, .2, 80, TOP_HZ, fs=SR, output="sos")
    return signal.sosfilt(low_pass, np.clip(wet, -1, 1))


dry = scene()
out = record(dry)
to_wav(out)
```